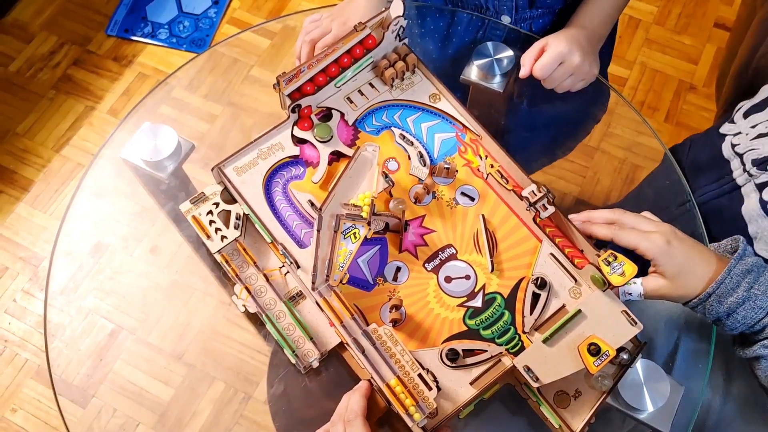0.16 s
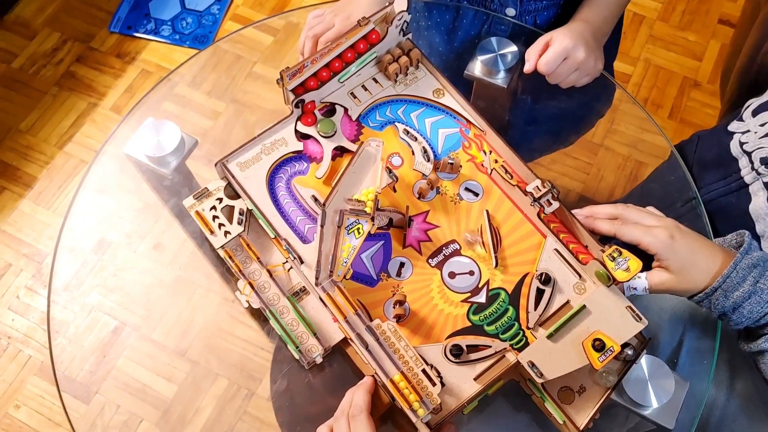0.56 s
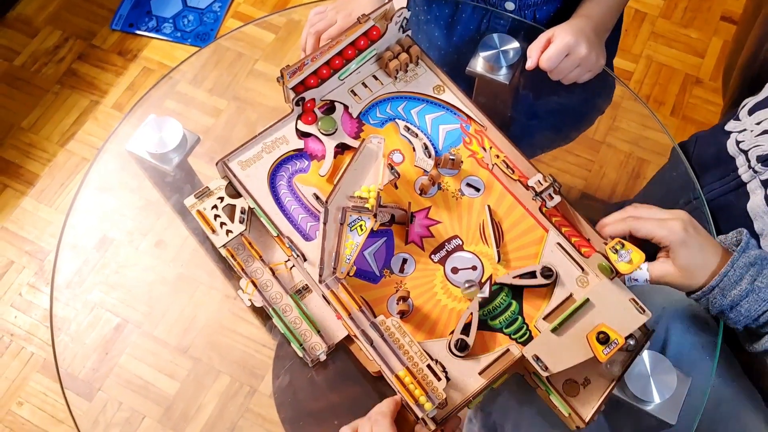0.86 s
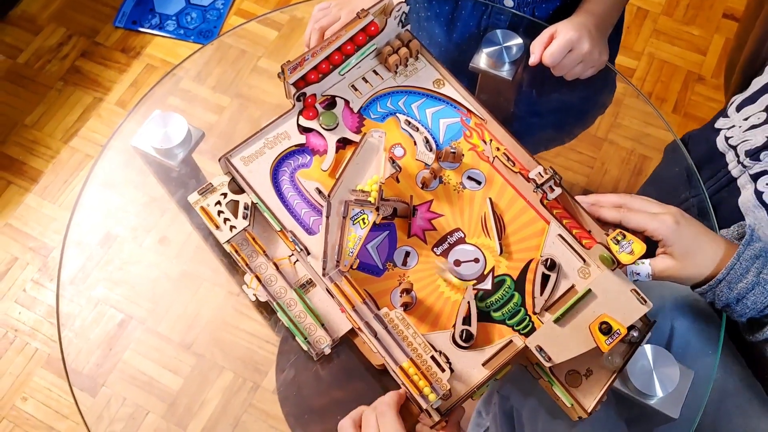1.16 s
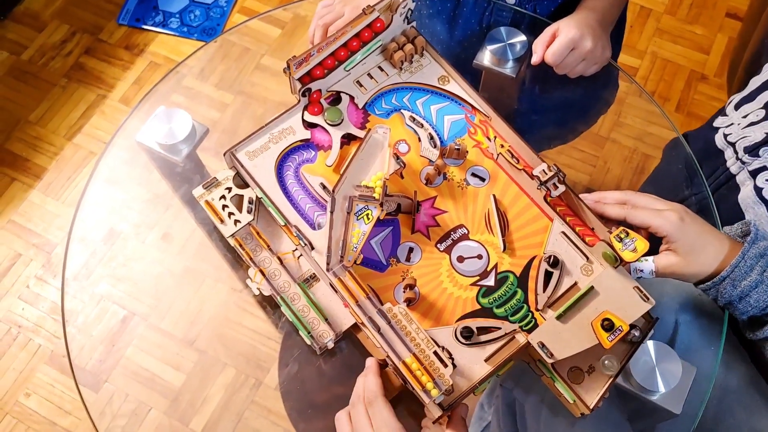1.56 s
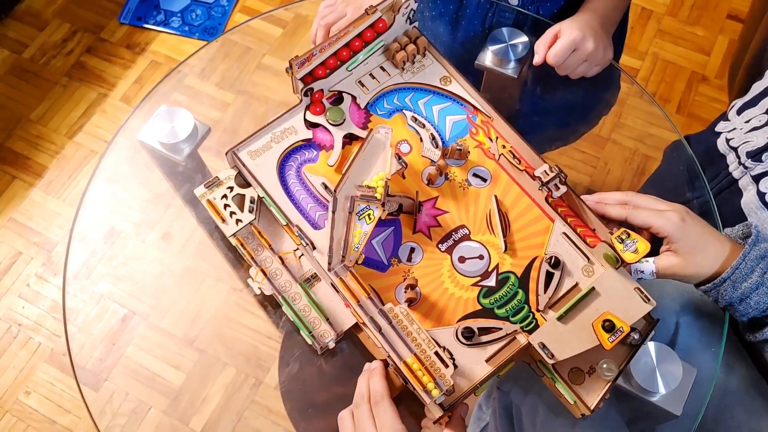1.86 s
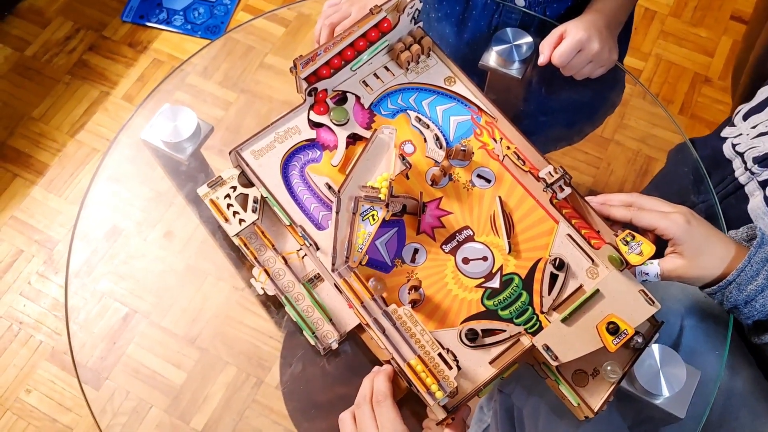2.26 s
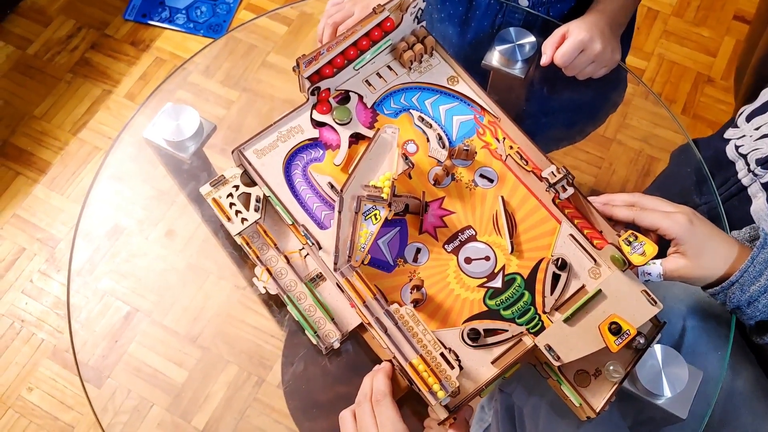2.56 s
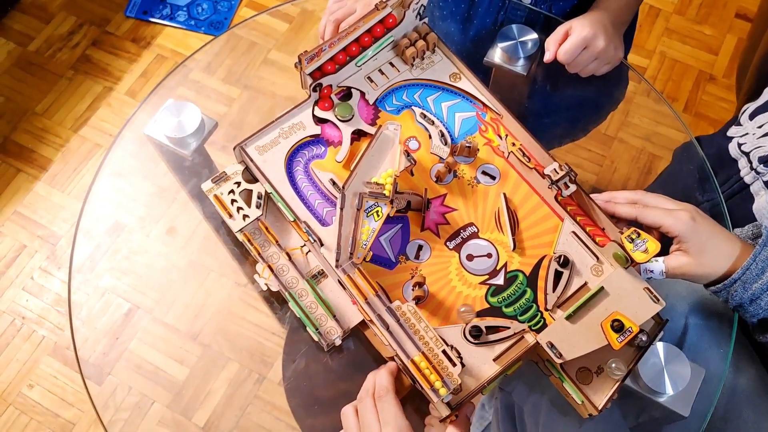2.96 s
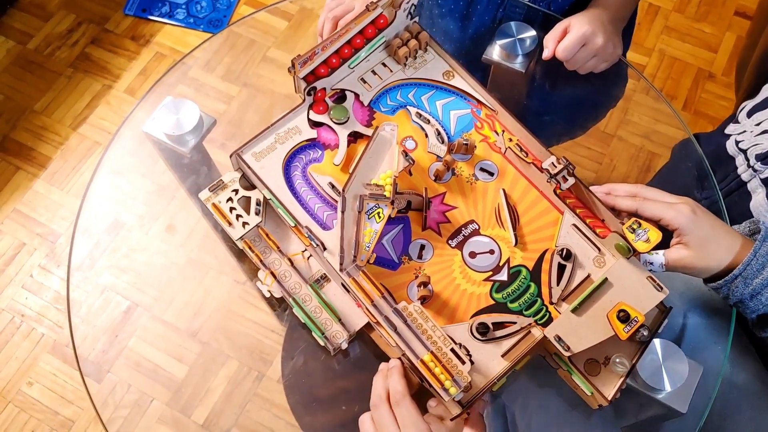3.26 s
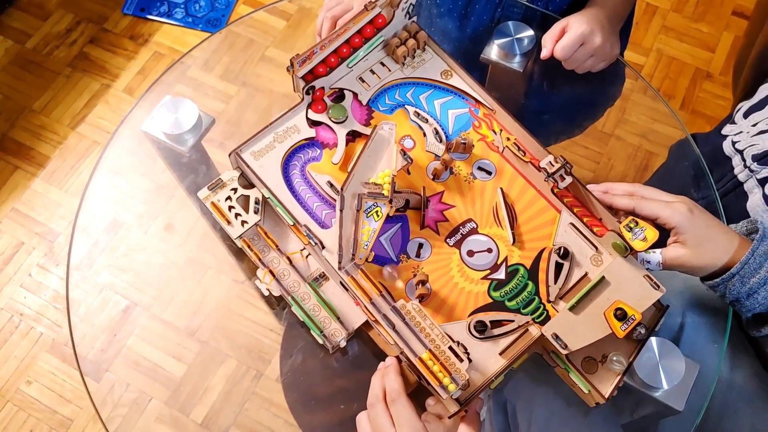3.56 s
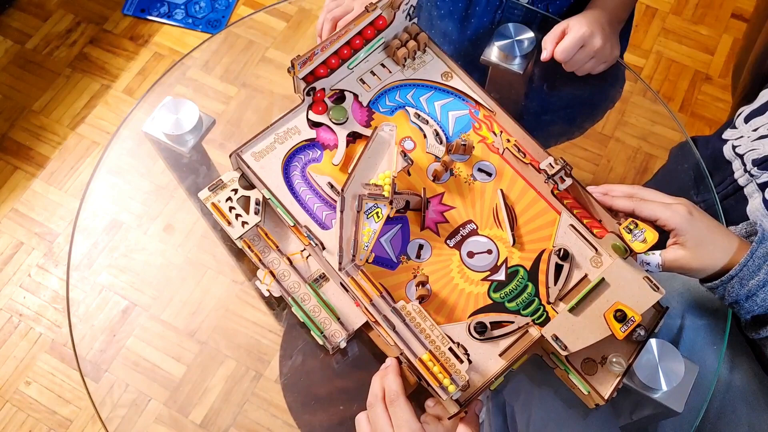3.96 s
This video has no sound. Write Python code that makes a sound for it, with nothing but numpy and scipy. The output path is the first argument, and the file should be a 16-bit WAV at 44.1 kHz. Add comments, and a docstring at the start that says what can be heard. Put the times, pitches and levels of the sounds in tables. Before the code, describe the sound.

A small plywood pinball toy on a table in a quiet room. A faint tick, then soft knocks and a rolling rumble lead into a loud burst of sharp flipper clacks and scrapes; a lull with isolated knocks and low thumps follows, then a second burst and sparse final clicks. Close stereo, bright and louder on the left, duller and weaker on the right.

```python
"""A steel ball rolls and knocks about a plywood toy pinball table in a small quiet room.
Room tone, a wavering drone and a faint hum last throughout. From 0.1 s hard knocks burst as short noise and
ring damped modes of pegs and board; from 0.4 s the ball rumbles as wood grain excites resonances; from 0.7 s
flipper levers scrape by stick-slip; from 1.8 s a hand shakes the table with three low thumps.
Two unlike microphones hear it: a bright near one on the left, a dull farther one on the right."""
import sys
import numpy as np
from scipy import signal
from scipy.io import wavfile
from scipy.ndimage import uniform_filter1d

SR = 44100
rng = np.random.default_rng(int(sys.argv[2]) if len(sys.argv) > 2 else 0)


def generate_wav(signal):
    """Clip the signal to [-1, 1] and save it as 16-bit WAV at the path in sys.argv[1]."""
    frames = np.transpose(np.atleast_2d(signal))
    scaled = np.clip(frames, -1, 1) * 32767
    pcm = np.round(scaled).astype(np.int16)
    wavfile.write(sys.argv[1], SR, pcm)


N = 180833

# vibration modes of the plywood box: mode_hz, relative_level_db, t60_s
BOARD_MODES = [(320, -20, .05), (475, 0, .07), (525, -4, .06), (590, -5, .06), (660, -7, .05),
               (750, 1, .07), (850, -6, .05), (940, -2, .06), (1040, -4, .05), (1210, -3, .06),
               (1490, -9, .04)]


def gain_of(db):
    """Amplitude ratio: 20 dB is a factor of ten."""
    return 10 ** (np.asarray(db) / 20)


def evened(x):
    """Normalisation: scales a signal to rms 1."""
    return x / np.sqrt(np.mean(x ** 2) + 1e-20)


def slow_drift(count, window):
    """Moving average: noise smoothed over a window of samples keeps only slow changes; rms 1."""
    return evened(uniform_filter1d(rng.standard_normal(count), window))


def read(points, hz):
    """Interpolation: reads a table on a log-frequency axis."""
    table_hz, value = np.transpose(points)
    return np.interp(np.log(hz + 1), np.log(table_hz + 1), value)


def add(mix, start_s, sound):
    """Superposition: sums a sound into the mix from start_s, cutting what overruns its end."""
    part = mix[..., round(start_s * SR):][..., :sound.shape[-1]]
    part += sound[..., :part.shape[-1]]


def band(x, lo_hz, hi_hz):
    """Band-pass filtering: a Butterworth response keeps one range of frequencies."""
    return signal.sosfilt(signal.butter(3, [lo_hz, hi_hz], "band", fs=SR, output="sos"), x)


def resonate(x, hz, width_hz):
    """Resonance by heterodyne: shifts a steady or moving pitch to zero, smooths, shifts back; peak gain 1."""
    carrier = np.exp(2j * np.pi * np.cumsum(hz * np.ones(len(x))) / SR)
    pole = np.exp(-np.pi * width_hz / SR)
    smoothed = signal.lfilter([1 - pole], [1, -pole], x / carrier + 1e-18)
    return 2 * (carrier * smoothed).real


def coloured(x, points):
    """Minimum-phase filtering: the log gain, read from (Hz, dB) points, fixes the phase of a causal filter."""
    log_gain = np.log(gain_of(read(points, abs(np.fft.fftfreq(8192, 1 / SR)))))
    phase = -signal.hilbert(log_gain).imag
    taps = np.fft.ifft(np.exp(log_gain + 1j * phase)).real[:4096]
    return signal.oaconvolve(x, taps)[:len(x)]


def ring(modes, t, centre_hz, octaves, spread_db):
    """Modal synthesis: sums damped sinusoids, favouring those near the pitch that the blow excites."""
    hz, db, t60 = np.transpose(modes)[:, :, None]
    place, detune = rng.standard_normal((2, len(modes), 1))
    favour_db = np.maximum(-6 * (np.log2(hz / centre_hz) / octaves) ** 2, -14) + spread_db * place
    decay = gain_of(db + favour_db - 60 * t / t60)
    tones = np.sin(2 * np.pi * hz * (1 + .012 * detune) * t)
    return (decay * tones).sum(0)


def echoes():
    """Reverberation: a table-top reflection in a dense tail, unlike in each channel, dying band by band."""
    # reverberation time: band_hz, t60_s
    decay_times = [(400, .18), (1500, .165), (5000, .19), (12000, .17)]
    hz, t, spectrum = signal.stft(rng.standard_normal((2, SR // 3)), SR, nperseg=128)
    decay = gain_of(-60 * t / read(decay_times, hz)[:, None])
    tail = signal.istft(spectrum * decay, SR, nperseg=128)[1]
    # the tail fades in from 3 to 7 ms
    tail *= np.clip((np.arange(tail.shape[1]) / SR - .003) / .004, 0, 1)
    tail /= np.linalg.norm(tail, axis=1, keepdims=True)
    tail[:, round(.007 * SR)] += .3  # the table-top reflection
    return tail


def at_mics(x, far_db, wet_db):
    """Propagation: the farther microphone gets the direct sound later and weaker; echoes reach both."""
    far_lag_s, far_echo_db = .004, -7
    heard = gain_of(wet_db) * signal.fftconvolve(x[None], echoes(), axes=1)
    heard[1] *= gain_of(far_echo_db)
    add(heard[0], 0, x)
    add(heard[1], far_lag_s, gain_of(far_db) * x)
    return heard


def room_tone():
    """Partial coherence: air noise in part shared by both microphones, with a drone and a faint hum."""
    # spectral density of the low air noise: band_hz, relative_level_db (per Hz)
    air_spectrum = [(20, -16), (60, -8), (120, -11.5), (170, -4), (230, -7.5), (300, -6), (360, -17),
                    (480, -7), (750, -17), (1200, -24.5), (2000, -26.5), (3000, -26.5), (6000, -44.5)]
    # wavering drone: centre_hz, width_hz (of each resonance), level_db (before balance), left_lead_rad
    drones = [(225, 35, -69.5, 0.69)]
    # levels before the left-right balance below
    air_db, air_hiss_db = -70.5, -72
    # steady hum of a distant appliance
    appliance_hz, appliance_db, left_lead_rad = 59, -74, 1.7

    common, *own = rng.standard_normal((3, N))
    waver = gain_of(1.2 * slow_drift(N, 3000))
    low = np.array([evened(coloured(x + 0.48 * common, air_spectrum)) for x in own])
    broad = rng.standard_normal((2, N))
    out = waver * (gain_of(air_db) * low + gain_of(air_hiss_db) * broad)
    for hz, width_hz, db, lead_rad in drones:
        tone = resonate(resonate(rng.standard_normal(N), hz, width_hz), hz, width_hz)
        lag = np.exp([[0], [-1j * lead_rad]])
        out += gain_of(db) * (signal.hilbert(evened(tone)) * lag).real
    phase = 2 * np.pi * appliance_hz * np.arange(N) / SR - np.array([[0], [left_lead_rad]])
    out += gain_of(appliance_db) * np.sqrt(2) * np.sin(phase)
    return out * gain_of([[2.2], [-1.8]])  # left, right balance in dB


def knock(crack_db, board_db, tick_db, ting_db, board_hz, peg_hz):
    """Impact excitation: milliseconds of chatter between hard parts set pegs and board ringing."""
    # vibration modes of small pegs and plates: mode_hz, relative_level_db, t60_s
    peg_modes = [(1700, -3, .04), (2250, 0, .025), (2550, 0, .03), (2900, -2, .025), (3200, -2, .025),
                 (3600, -3, .03), (4100, -7, .12), (4500, -2, .03), (5200, -3, .03)]
    tick_hz, tick_width_hz = 7248, 1300

    t = np.arange(SR // 5) / SR
    chatter = rng.standard_normal(len(t)) * t * np.exp(-t / 0.0013)
    snap = band(chatter, 1500, 5500)
    snap = snap + 1.2 * resonate(snap, peg_hz, 600)
    pegs = ring(peg_modes, t, peg_hz, octaves=.25, spread_db=2.5)
    crack = snap / abs(snap).max() + 0.32 * pegs / abs(pegs).max()

    board = band(ring(BOARD_MODES, t, board_hz, octaves=.9, spread_db=2.5), 400, 3000)
    # the whole box jumps a little
    jolt = t * np.exp(-t / 0.0012) * np.cos(2 * np.pi * 90 * t)
    tick = band(chatter, 6000, 9000)
    tick = tick + 4 * resonate(resonate(tick, tick_hz, tick_width_hz), tick_hz, tick_width_hz)
    ting = band(chatter, 9000, 17000)

    sound = gain_of(crack_db) * crack
    for db, part in [(board_db, board), (board_db - 24.5, jolt), (tick_db, tick), (ting_db, ting)]:
        # levelled by the rms of its first 10 ms
        sound = sound + gain_of(db) * part / np.sqrt(np.mean(part[:SR // 100] ** 2))
    return sound


def roll(length_s, rumble_db, change_db, spot_hz, spot_share):
    """Rolling excitation: wood grain bumps the ball; the board answers, with a resonance at the ball's spot."""
    rise_s, fall_s = 0.026, .02
    pitch_wander = .025  # rms share of the spot's pitch

    t = np.arange(0, length_s, 1 / SR)
    ends = np.clip(np.minimum(t / rise_s, (length_s - t) / fall_s), 0, 1)
    bumps = rng.standard_normal(len(t)) * gain_of(4.5 * slow_drift(len(t), 500))
    response = ring(BOARD_MODES, np.arange(SR // 8) / SR, 800, octaves=1., spread_db=1.)
    box = band(signal.oaconvolve(bumps, response)[:len(t)], 410, 1800)

    hz = spot_hz * (1 + pitch_wander * slow_drift(len(t), 1500))
    spot = bumps
    for _ in range(3):
        spot = resonate(spot, hz, 150)

    share = np.clip(spot_share, 0, 1)
    # squared weights sum to 1
    rumble = np.sqrt(1 - share ** 2) * evened(box) + share * evened(spot)
    return ends * gain_of(rumble_db + change_db * t / length_s) * rumble


def slide(build_s, fizz_db, rasp_db):
    """Stick-slip friction: wood on wood slips in dense uneven clicks, building up and dying away."""
    build_db, die_db_per_s, tail_s = 17.5, 222, 0.16
    slips_per_s, clump_db = 2200, 3.  # mean rate; rms level swing that gathers slips into clumps

    t = np.arange(-build_s, tail_s, 1 / SR)
    stroke = gain_of(np.where(t < 0, build_db * t / build_s, -die_db_per_s * t))
    slips = rng.standard_normal(len(t)) * (rng.random(len(t)) < slips_per_s / SR)
    slips *= gain_of(2.2 * rng.exponential(1, len(t)))
    slips *= gain_of(clump_db * slow_drift(len(t), 250))
    rasp = evened(band(slips, 1300, 5600))
    fizz = evened(band(slips, 5600, 17000))
    return stroke * (gain_of(rasp_db) * rasp + gain_of(fizz_db) * fizz)


def thumps():
    """Impulsive low-frequency forcing: a hand's short pushes shake the table."""
    # pushes: start_s, level_db (before the left and right gains below), pitch_hz
    pushes = [(1.84, -66, 70), (2.35, -66, 60), (2.865, -60, 65)]
    peak_s = .012
    out, t = np.zeros((2, N)), np.arange(SR // 8) / SR
    for start_s, db, hz in pushes:
        envelope = t / peak_s * np.exp(1 - t / peak_s)
        push = np.sin(2 * np.pi * hz * t) * envelope
        add(out, start_s, gain_of(db) * push * np.array([[1.4], [.6]]))
    return out


def scene():
    """Superposition: sums the room, the table's sounds and their echoes at both microphones."""
    # all levels are those before the microphones' colour
    # knocks and clacks: start_s, crack_db, board_ring_db, tick_db, ting_db, board_pitch_hz, peg_pitch_hz,
    # echo_db (rattle and echo share)
    knock_events = [(0.091, -37.5, -50.5, -39, -41.5, 1030, 4700, -2.5),
                    (0.2254, -74, -64.5, -75, -78, 670, 2700, 4),
                    (0.4456, -60, -57.5, -82, -78, 700, 2500, -3),
                    (0.4674, -60, -55.5, -79, -83, 920, 1700, 1.5),
                    (0.5035, -65, -48.5, -74, -67, 880, 1700, 0.5),
                    (0.5452, -51.5, -37, -68, -68, 920, 1700, -6),
                    (0.627, -31, -41.5, -45, -38, 724, 5340, -3.5),
                    (0.6462, -29, -26.5, -50, -42, 830, 2900, -6),
                    (0.7399, -6.5, -27.5, -22, -17, 775, 2320, -1),
                    (0.7668, -11.5, -28, -21, -20.5, 1230, 2150, 3.5),
                    (0.9387, -23, -46.5, -35.5, -30.5, 730, 5000, 2),
                    (0.9835, -20, -33, -29, -22, 830, 5300, 2),
                    (1.0044, -16.5, -40, -29.5, -42, 915, 4800, 2.5),
                    (1.0933, -19.5, -45, -37, -36, 779, 3190, -7),
                    (1.1014, -32, -40.5, -28.5, -27, 810, 2840, -0.5),
                    (1.1087, -22, -47, -32.5, -24.5, 760, 5300, 3),
                    (1.1347, -9.5, -30.5, -24, -13, 780, 5220, 0),
                    (1.1489, -11.5, -35.5, -25.5, -20.5, 825, 2600, -2.5),
                    (1.2436, -11.5, -29.5, -25, -17, 870, 4330, -5),
                    (1.3134, -26, -41, -37, -33.5, 1000, 3680, 0),
                    (1.3996, -13, -36, -25, -11.5, 780, 4700, -4.5),
                    (1.462, -12, -24.5, -28, -26, 518, 4550, -4),
                    (1.9882, -63, -52, -84, -74.5, 720, 1760, -4),
                    (2.0954, -22, -33.5, -52, -51, 730, 2880, -6),
                    (2.2454, -60.5, -65.5, -70, -67.5, 470, 2290, -2),
                    (2.4303, -54.5, -67, -74, -70.5, 487, 2750, 0.5),
                    (2.5196, -33, -44.5, -50, -58, 470, 2700, -3.5),
                    (2.6524, -66, -88.5, -46, -71, 470, 4170, -1),
                    (2.6683, -57, -74, -47, -57.5, 463, 3740, 0),
                    (2.803, -25.5, -47.5, -46, -53.5, 756, 4030, -3.5),
                    (2.9915, -44, -54.5, -58, -62.5, 905, 2290, 7),
                    (3.025, -23.5, -38.5, -28.5, -39, 760, 3070, 4),
                    (3.056, -4.5, -24, -19, -14, 880, 2240, -2),
                    (3.1358, -13.5, -26.5, -19.5, -9.5, 770, 5300, -3.5),
                    (3.181, -19.5, -34, -24, -25, 750, 4800, -3),
                    (3.2308, -20.5, -32.5, -34.5, -30, 496, 5200, -3),
                    (3.263, -9, -40, -16, -13.5, 750, 4430, -3.5),
                    (3.3985, -12, -28.5, -29, -33.5, 500, 4260, -1.5),
                    (3.6685, -37.5, -44, -80.5, -80.5, 760, 2780, -5.5),
                    (3.9759, -17.5, -48.5, -35, -40, 798, 3880, -6.5)]
    # ball rolling on the board: start_s, length_s, rumble_db (at the start), change_db (over the run),
    # spot_pitch_hz (resonance under the ball), spot_share (0 to 1)
    roll_events = [(0.422, 0.12, -59, 10, 930, 0.63), (0.562, 0.17, -48.5, 12.5, 740, 0.79),
                   (0.771, 0.15, -41, -20, 850, 0.1), (0.95, 0.15, -50.5, -2.5, 860, 0.8),
                   (1.095, 0.31, -38, -8.5, 800, 0.6), (1.363, 0.2, -41.5, -12, 760, .5),
                   (1.822, 0.26, -48.5, -4.5, 721, 0.99), (1.972, .13, -58, 3.5, 910, 0.2),
                   (2.856, 0.49, -62.5, 2, 830, 0.2), (3.069, 0.35, -52, 2, 750, 0.91),
                   (3.518, .15, -54, -8, 730, 0.69), (4.036, 0.051, -55.5, -5.5, 850, 0.13)]
    # flipper levers sliding in their guides: loudest_s, build_s, fizz_db, rasp_db (both at the loudest)
    slide_events = [(0.73, 0.044, -18.5, -33), (0.781, .02, -25, -26), (0.82, 0.034, -33.5, -46),
                    (0.90, 0.038, -35, -40.5), (0.964, 0.022, -27, -41), (1.04, .03, -31.5, -44),
                    (1.125, 0.017, -31, -49), (1.175, 0.024, -27, -34.5), (1.261, 0.018, -31, -38),
                    (1.389, .06, -27, -40), (1.415, .012, -25, -39), (3.045, 0.033, -21.5, -32.5),
                    (3.074, 0.016, -35, -28.5), (3.155, .015, -34, -32), (3.245, 0.061, -24, -39.5),
                    (3.29, 0.029, -23.5, -51)]

    mix = room_tone() + thumps()
    for start_s, *blow, echo_db in knock_events:
        add(mix, start_s, at_mics(knock(*blow), far_db=-12.0, wet_db=echo_db))
    for start_s, *run in roll_events:
        add(mix, start_s, at_mics(roll(*run), far_db=-12.2, wet_db=-3.5))
    for loudest_s, build_s, *levels in slide_events:
        sound = slide(build_s, *levels)
        add(mix, loudest_s - build_s, at_mics(sound, far_db=-12.6, wet_db=-1.5))
    return mix


def record(dry):
    """Transduction: each microphone's frequency response colours the sound; hiss and a band limit follow."""
    # cancellation of a narrow band by the table top's reflection: band_hz, level_db
    table_dip = [(1500, 0.5), (1800, -1), (2000, -10), (2200, -0.5)]
    # response of the near, left microphone: band_hz, level_db
    near_response = [(100, -8.5), (1000, 3), (5500, -2), (6500, -1), (7500, 2.5), (8300, -10.5),
                     (9000, -16), (9800, -10), (10900, 2), (11800, -1), (12600, -14.5), (14000, -44.5),
                     (16000, -51)]
    # response of the far, right microphone: band_hz, level_db
    far_response = [(100, 0.5), (600, 2.5), (1200, 7.5), (2500, -4), (3800, 4), (5000, -0.5), (6200, -6.5),
                    (7500, -23), (9000, -20), (10900, -8.5), (11800, -7), (12600, -24), (14000, -38),
                    (16000, -68.5)]
    hiss_db, edge_hz = -87, 16600  # hiss level before its band-pass; upper band limit

    near = coloured(coloured(dry[0], table_dip), near_response)
    far = coloured(dry[1], far_response)
    hiss = band(rng.standard_normal(dry.shape), 3000, 14500)
    mics = np.array([near, far]) + gain_of(hiss_db) * hiss
    low_pass = signal.firwin(511, edge_hz, window=("kaiser", 9), fs=SR)
    return signal.oaconvolve(mics, low_pass[None], "same")


dry = scene()
out = record(dry)
generate_wav(out)
```